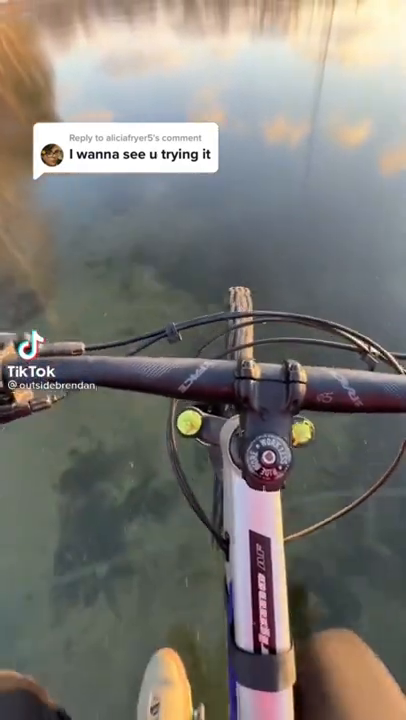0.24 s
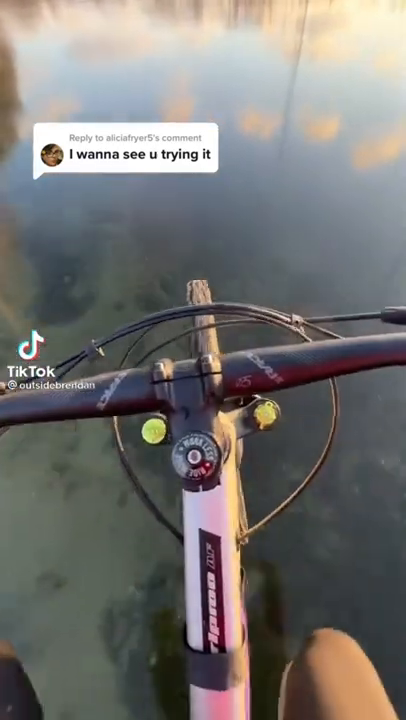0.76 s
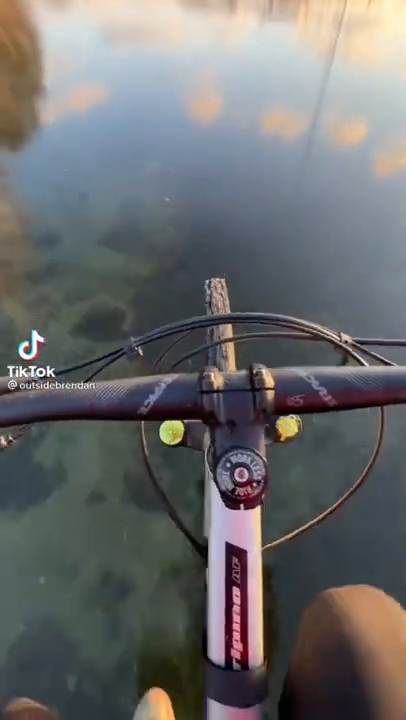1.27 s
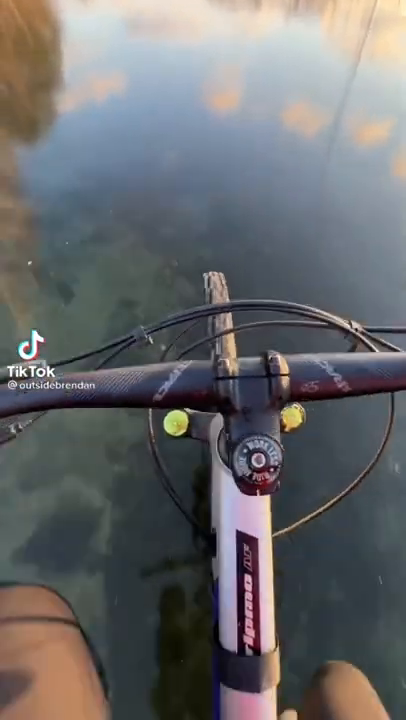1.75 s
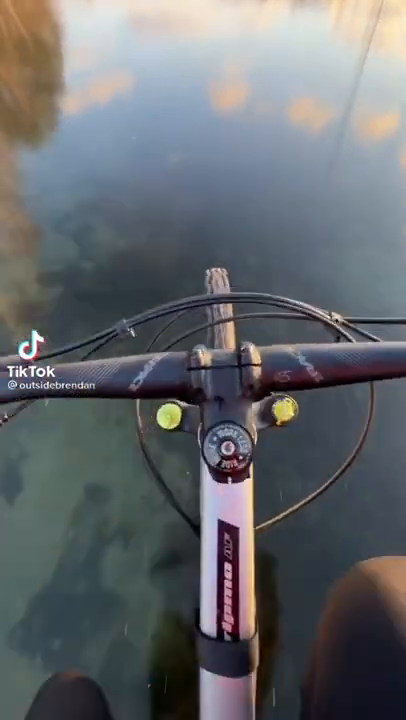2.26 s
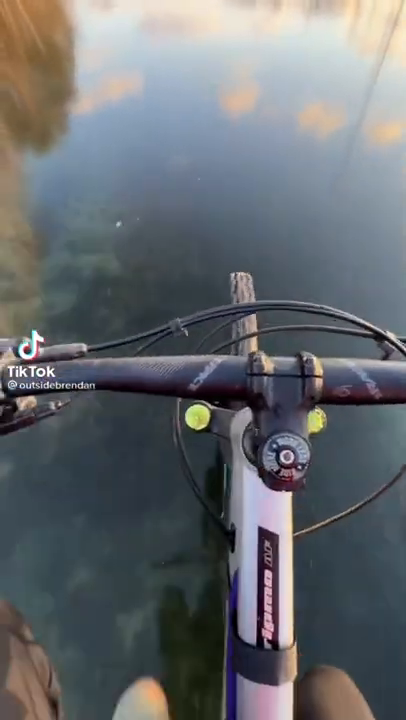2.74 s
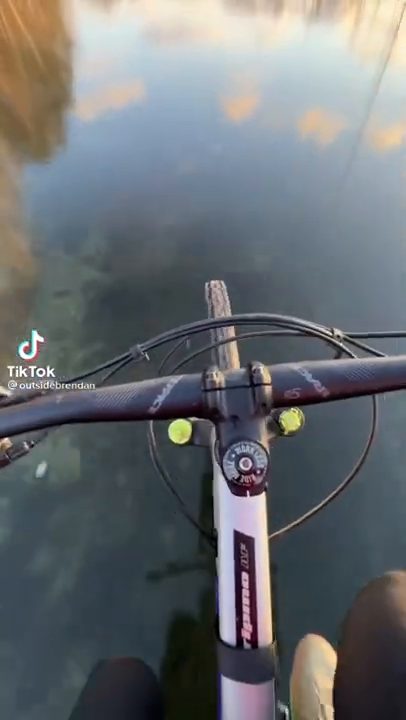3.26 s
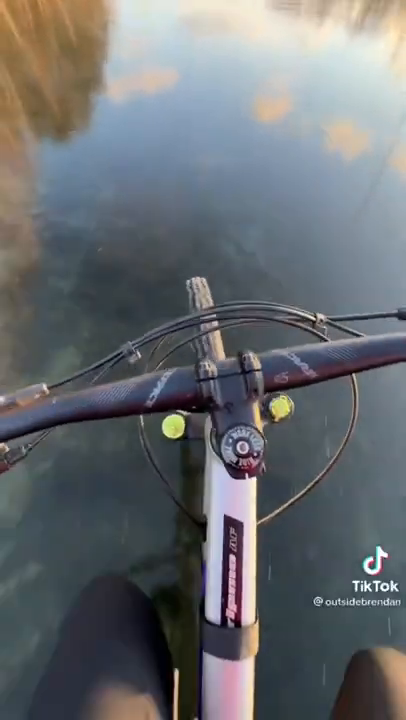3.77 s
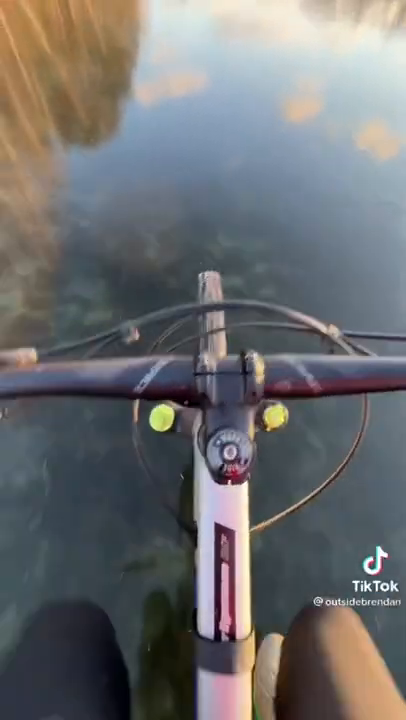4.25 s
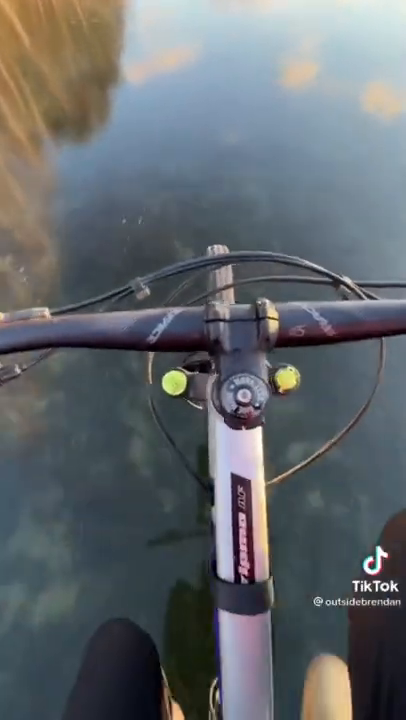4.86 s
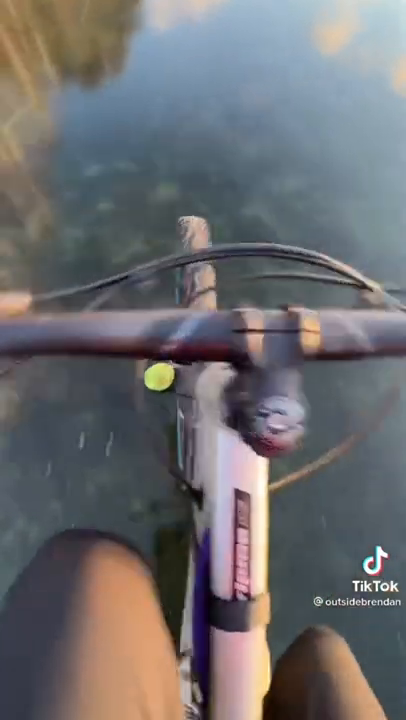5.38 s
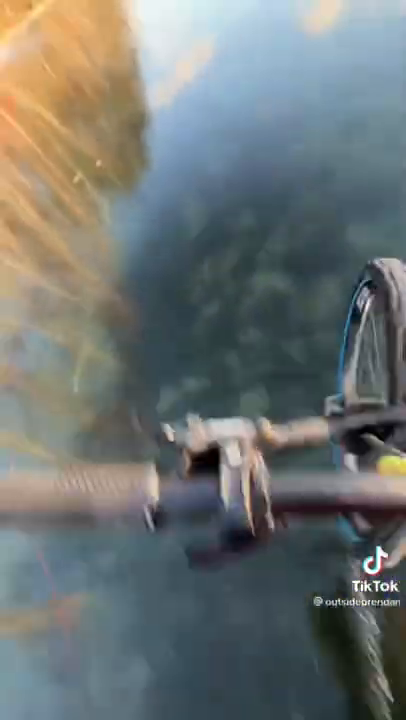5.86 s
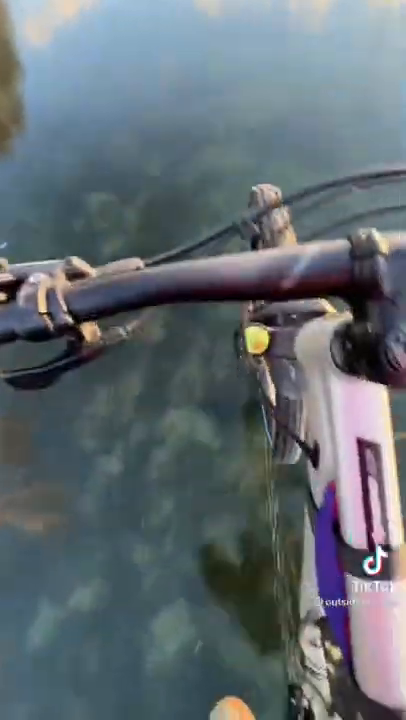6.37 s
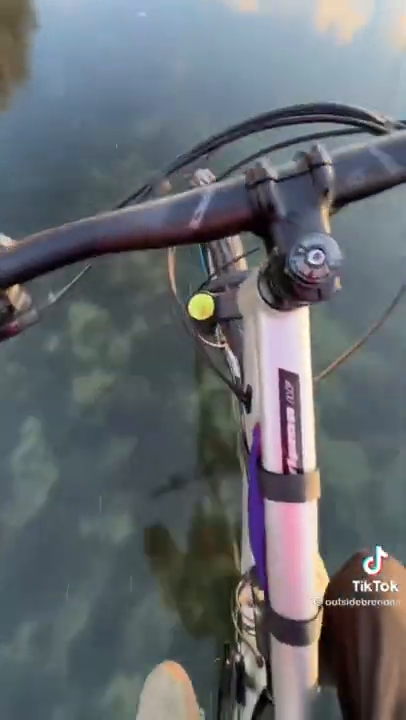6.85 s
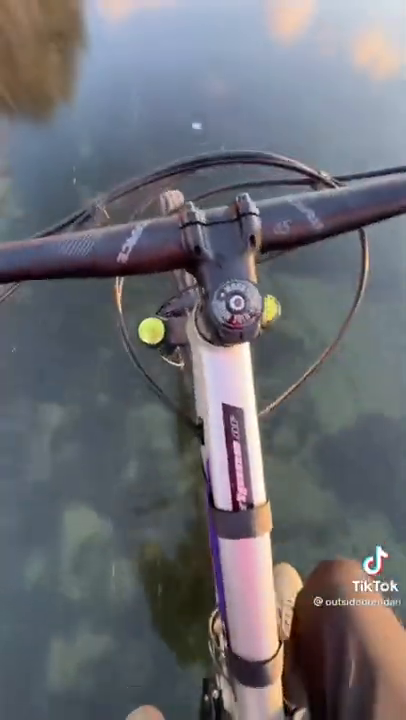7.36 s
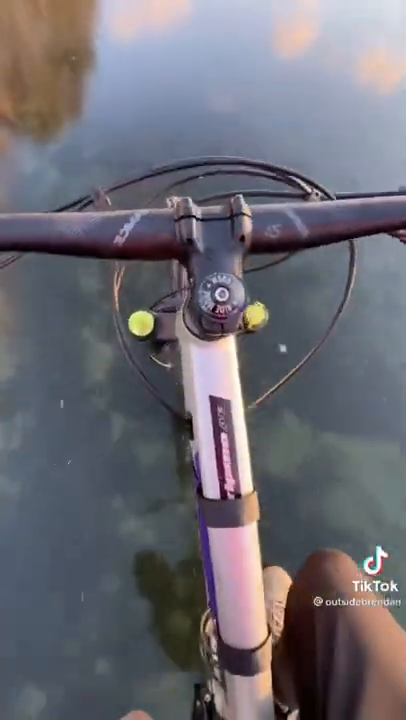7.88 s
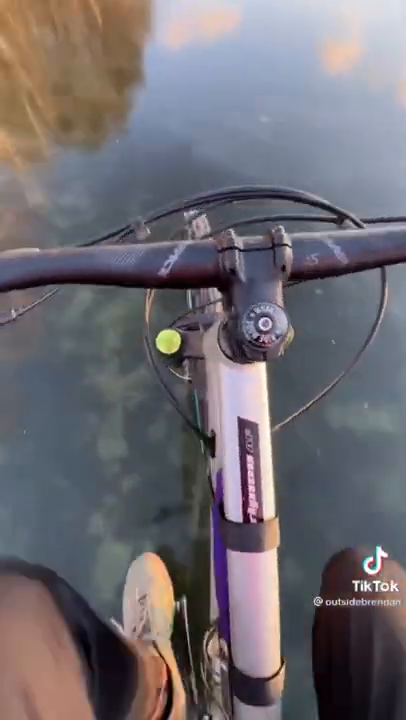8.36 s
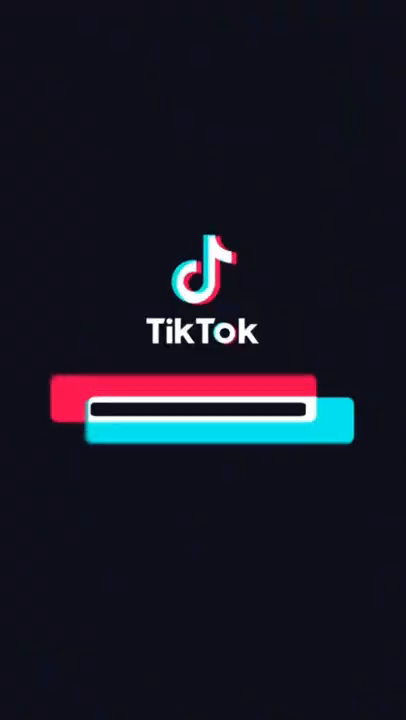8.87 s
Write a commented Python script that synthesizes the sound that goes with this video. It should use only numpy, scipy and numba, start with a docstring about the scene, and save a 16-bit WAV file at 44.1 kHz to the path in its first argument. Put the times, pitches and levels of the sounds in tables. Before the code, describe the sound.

Dense sharp ice clicks from a rolling studded bike, faint chain scrapes early, freehub ticking and rougher crunching later, suddenly cut to silence.

```python
"""A bike on studded tyres rolls over lake ice, heard at two microphone ports on the rider's chest.
From the start studs click on the ice over tyre hum, dust hiss and low wind: sine packets over filtered noise.
The chain scrapes mostly in the first two seconds: short bursts of ringing noise.
From 5.3 s the freehub ticks while coasting, the studs crack harder and the wind and thumps grow rougher.
Near 8.5 s the sound is cut off by a fast fade."""
import sys
import numpy as np
from scipy import signal
from scipy.fft import rfft, irfft, next_fast_len
from scipy.io import wavfile
from scipy.ndimage import uniform_filter1d
from numba import njit

SR = 44100
rng = np.random.default_rng(int(sys.argv[2]) if len(sys.argv) > 2 else 0)


def file_out(sig):
    """Save sig as 16-bit WAV at sys.argv[1]."""
    # one column per channel
    cols = np.atleast_2d(sig).T
    # limit, then scale
    lim = np.clip(cols, -1, 1)
    pcm = np.round(lim * 32767).astype(np.int16)
    wavfile.write(sys.argv[1], SR, pcm)


N = 402277
T = np.arange(N) / SR


def undb(db):
    """Amplitude ratio of a level in dB."""
    return 10 ** (np.asarray(db) / 20)


def unit(x):
    """Scale to an RMS of 1."""
    return x / np.sqrt(np.mean(x ** 2))


def curve(table):
    """Interpolate each column after the first over time."""
    s, *columns = np.transpose(table)
    return [np.interp(T, s, c) for c in columns]


def colour(x, table):
    """Filter by (Hz, dB) or (Hz, dB, phase in rad) points on a log frequency axis."""
    hz, db, *phase = np.transpose(table)
    size = next_fast_len(N)
    log_hz = np.log(np.arange(size // 2 + 1) * SR / size + 1)
    gain = undb(np.interp(log_hz, np.log(hz), db))
    if phase:
        gain = gain * np.exp(1j * np.interp(log_hz, np.log(hz), phase[0]))
    return irfft(rfft(x, size) * gain, size)[..., :N]


def ring(x, modes):
    """Sum of damped resonances, each (Hz, width Hz, dB)."""
    return sum(undb(db) * signal.lfilter(*signal.iirpeak(hz, hz / width_hz, SR), x)
               for hz, width_hz, db in modes)


def walk(rate_hz):
    """Random levels held 1 / rate_hz s, smoothed twice, RMS 1."""
    hold = int(SR / rate_hz)
    steps = np.repeat(rng.standard_normal(N // hold + 1), hold)
    return unit(uniform_filter1d(uniform_filter1d(steps, hold), hold)[:N])


@njit
def grains(s, hz, cycles, size, phase, sag, n, sr):
    """Wave packets, loudest at s after a rise of some cycles; pitch falls by the share sag per rise time."""
    y = np.zeros(n)
    for k in range(len(s)):
        rise = cycles[k] * sr / hz[k]  # samples
        start = max(int(s[k] * sr - rise), 0)
        for i in range(min(int(3 * rise), n - start)):
            u = i / rise
            turns = cycles[k] * (u - 1) * (1 - sag * (u - 1) / 2)
            swell = (u * np.exp(1 - u)) ** 6
            y[start + i] += size[k] * swell * np.sin(2 * np.pi * turns + phase[k])
    return y


def bursts(s, db, length_s):
    """Envelope of bursts that start at s, peak at half their length and fade."""
    env = np.zeros(N)
    for start_s, peak, long_s in np.broadcast(s, undb(db), np.clip(length_s, .001, .6)):
        i = int(start_s * SR)
        u = 4 * T[:int(3 * long_s * SR)] / long_s
        env[i:i + len(u)] += peak * (u / 2) ** 2 * np.exp(2 - u)
    return env


# Wind at the ports. Each row: time in seconds, common part in dB, differing part in dB.
WIND_LEVEL = [(0, -44.5, -60), (.8, -40.5, -68.5), (1.7, -43, -56.5), (2.2, -41, -64), (2.5, -45, -43.5),
              (2.8, -44.5, -60.5), (3.4, -42.5, -59.5), (3.9, -47.5, -32.5), (4.35, -43.5, -42.5),
              (4.85, -47.5, -31.5), (5.3, -42, -36), (5.7, -37, -50.5), (6, -37, -39), (6.2, -41.5, -42.5),
              (6.4, -35, -42), (6.53, -36, -43), (6.66, -39.5, -32.5), (6.8, -33, -30.5),
              (6.87, -49, -31.5), (7.1, -47, -49), (7.4, -50.5, -56), (7.85, -48.5, -46.5),
              (8.4, -52, -47.5)]
# Spectrum of the common wind. Each row: frequency in Hz, relative level in dB per Hz.
GUST_COLOUR = [(13, -47), (22, -46), (43, -8), (70, 3.5), (110, 1), (178, -9.5), (281, -14.5), (300, -26.5),
               (390, -52), (660, -120)]
# Spectrum of the differing wind. Each row: frequency in Hz, relative level in dB per Hz.
CROSSWIND_COLOUR = [(13, -50.5), (22, -33.5), (43, -12.5), (87, -4), (176, -12.5), (411, -25.5),
                    (450, -26.5), (500, -26), (650, -51.5), (1100, -120)]
# headwind flutter, extra flutter in a crosswind, crosswind buffeting relative to the common part
FLUTTER_DB, CROSS_FLUTTER_DB, BUFFET_DB = 0.8, 3, -2.5
BUFFET_MODE = [(50.1, 41, 0)]


def wind():
    """Fluttering low turbulence, common and differing at the ports; rougher and deeper in a crosswind."""
    mid_db, side_db = curve(WIND_LEVEL)
    across = 1 / (1 + undb(-47.5 - side_db))  # 0-1
    flutter_db = FLUTTER_DB * walk(20) + CROSS_FLUTTER_DB * across * walk(10)
    mid = colour(rng.standard_normal(N) * undb(flutter_db), GUST_COLOUR)
    side = colour(rng.standard_normal(N) * undb(3.3 * walk(14)), CROSSWIND_COLOUR)
    rumble = unit(ring(ring(rng.standard_normal(N), BUFFET_MODE), BUFFET_MODE))
    buffet = across * rumble * undb(2.7 * walk(13))
    return undb(mid_db) * (unit(mid) + undb(BUFFET_DB) * buffet), undb(side_db) * unit(side)


# Dull knocks and gust thumps. Each row: peak time in seconds, peak in dB, pitch in Hz, rise in cycles.
KNOCK_EVENTS = [(0.33, -17.5, 500, 0.42), (0.672, -21, 355, 0.86), (2.128, -24, 520, 2.6),
                (2.471, -26, 430, 1.4), (4.61, -30, 95, 0.74), (4.671, -30, 440, 2.2),
                (4.68, -27.5, 80.5, 1.1), (5.175, -28.5, 65, 1.2), (5.303, -29.5, 70, 1.8),
                (5.36, -26, 64.8, 1.3), (5.503, -27.5, 91, 1.1), (5.527, -28, 103, 1.9),
                (5.605, -27, 61, 0.9), (5.901, -34, 78.4, 1.4), (6.102, -21, 128, 2.6),
                (6.316, -22.5, 85, 1.1), (6.481, -22, 97, 2.3), (6.549, -36, 95, 1.3),
                (6.618, -26, 80, 1.5), (6.685, -32, 125, 2), (6.696, -33, 277, 3), (6.724, -29, 140, 4.2),
                (6.775, -31.5, 75.4, 1.2), (6.816, -32, 99, 2.3), (7.872, -32.5, 69, 1.5),
                (8.135, -30, 560, 1.56), (8.141, -28.5, 262, 3.4)]
KNOCK_SAG = 0.37  # share of pitch lost per rise time


def knocks():
    """Heavily damped low wave packets whose pitch sags."""
    s, db, hz, cycles = np.transpose(KNOCK_EVENTS).astype(float)
    return grains(s, hz, cycles, undb(db), np.zeros(len(s)), KNOCK_SAG, N, 1. * SR)


# Spectrum of the tyre hum. Each row: frequency in Hz, relative level in dB per Hz.
HUM_COLOUR = [(71, -30.5), (120, -13), (172, -4.5), (312, -1), (345, -7.5), (374, -2.5), (417, -2.5),
              (485, -7), (622, -12.5), (1300, -16.5), (1690, -20), (2860, -120)]
# Tyre hum. Each row: time in seconds, level in dB.
HUM_LEVEL_DB = [(0, -42), (1.7, -44), (3.4, -43), (4.2, -42.5), (4.75, -44.5), (5.7, -42), (6.2, -45.5),
                (7, -42), (8.4, -45.5)]


def tyre_hum():
    """Tread knobs hum through the frame: low coloured noise with an unsteady level."""
    noise = unit(colour(rng.standard_normal((2, N)), HUM_COLOUR))
    return noise * undb(curve(HUM_LEVEL_DB)[0] + 1.96 * walk(25))


# Stud crackle, also drives the dust. Each row: time in seconds, level in dB before colouring.
CRACKLE_LEVEL = [(0, -43.5), (.2, -40.5), (.5, -46.5), (.9, -44), (1.3, -41.5), (1.6, -43), (1.8, -44.5),
                 (2.15, -44), (2.7, -44.5), (3.05, -42), (3.4, -39), (3.65, -43), (3.85, -33.5), (4, -37),
                 (4.12, -38.5), (4.3, -44.5), (4.85, -42), (5.05, -39), (5.22, -43), (5.55, -34.5),
                 (5.8, -34), (5.95, -38), (6.3, -40), (6.5, -40.5), (6.7, -39.5), (7, -38.5), (7.25, -40),
                 (7.6, -45), (8.05, -42), (8.46, -45.5)]
# Spectrum of the dust hiss. Each row: frequency in Hz, relative level in dB per Hz.
HISS_COLOUR = [(2000, -2), (3500, 0.5), (4500, -5.5), (4850, -6), (5240, -3), (6700, -9), (7400, -15),
               (10600, -17), (12000, -25.5)]
# Sprays of ice dust as the tyres slide. Each row: start in seconds, peak in dB, length in seconds.
SPRAY_EVENTS = [(5.405, -55.5, 0.29), (6.825, -40, 0.14), (6.97, -40, 0.099)]
# hiss level at CALM_DB of crackle, its rise in dB per dB of crackle
HISS_DB, HISS_PER_DB, CALM_DB = -46.5, 0.52, -44


def dust_hiss():
    """Ice dust hisses with a fine grain, louder as the studs crackle harder."""
    steady = undb(HISS_DB + HISS_PER_DB * (curve(CRACKLE_LEVEL)[0] - CALM_DB))
    sprays = bursts(*np.transpose(SPRAY_EVENTS)) * undb(2.2 * walk(130))
    grain = undb(2.0 * walk(60) + 1.24 * walk(350))
    return unit(colour(rng.standard_normal((2, N)), HISS_COLOUR)) * (steady + sprays) * grain


# Chain ticks and scrapes. Each row: start in seconds, peak in dB, length in seconds.
CHAIN_EVENTS = [(0.021, -36.5, 0.0049), (0.263, -38.5, 0.073), (0.301, -39.5, 0.011),
                (0.318, -35.5, 0.0043), (0.324, -32.5, 0.0032), (0.345, -38, 0.0061), (0.395, -44, 0.0028),
                (0.697, -41, 0.01), (0.799, -41.5, 0.0026), (1.04, -42, 0.0031), (1.077, -28.5, 0.0025),
                (1.59, -33.5, 0.0017), (1.713, -30.5, 0.0018), (2.058, -33, 0.02), (2.093, -38, 0.0048),
                (2.103, -30.5, 0.007), (2.112, -28.5, 0.013), (2.117, -31, 0.017), (2.131, -36.5, 0.0033),
                (4.092, -47.5, 0.065)]
# Chain resonances. Each row: frequency in Hz, width in Hz, relative level in dB.
CHAIN_MODES = [(7180, 1100, -1), (9800, 2500, -4), (5620, 1600, 1.5), (2590, 1200, 6.5), (750, 860, 5.5)]


def chain():
    """Chain ticks and scrapes: rough noise bursts through broad metal resonances."""
    rough = bursts(*np.transpose(CHAIN_EVENTS)) * undb(2.4 * walk(400))
    return rough * unit(ring(rng.standard_normal((2, N)), CHAIN_MODES))


# Freehub while coasting. Each row: time in seconds, teeth passed.
HUB_TEETH = [(5.263, 0), (5.399, 6), (5.613, 18), (5.781, 25), (5.978, 34), (6.232, 47), (6.451, 59),
             (6.616, 67), (6.849, 78), (7.07, 88), (7.17, 92), (7.457, 105), (8.012, 129)]
# Freehub ticks. Each row: time in seconds, mean tick level in dB.
TICK_LEVEL = [(5.25, -55.5), (5.7, -40), (6, -47.5), (6.35, -40.5), (6.6, -43.5), (7, -42.5), (7.6, -46.5),
              (7.97, -43.5), (8.06, -53)]
# Hub shell resonances. Each row: frequency in Hz, width in Hz, relative level in dB.
HUB_MODES = [(7430, 1800, 11), (7430, 120, 9), (9340, 1200, 6), (9700, 150, 6.5), (8960, 130, 4),
             (5180, 200, 7.5)]


def freehub():
    """Pawls snap over the teeth and drag between them, ringing the hub shell."""
    s, teeth = np.transpose(HUB_TEETH)
    tick_s = np.interp(np.arange(teeth[-1] + 1), teeth, s)
    level_s, level_db = np.transpose(TICK_LEVEL)
    tick_db = np.interp(tick_s, level_s, level_db) + 2.0 * rng.standard_normal(len(tick_s))
    # the drag weakens by 3.2 dB/s against the ticks
    drag_db = np.interp(T, level_s, level_db, -99, -99) - 10.5 - 3.2 * (T - 7.0) + 2.9 * walk(9)
    envelope = bursts(tick_s - .001, tick_db, 0.005) + undb(drag_db)
    noise = rng.standard_normal((2, N))
    # the balance of the modes wanders from tick to tick
    shell = sum(undb(1.1 * walk(40)) * ring(noise, [mode]) for mode in HUB_MODES)
    return envelope * unit(shell)


# Ice sheet resonances. Each row: frequency in Hz, width in Hz, relative level in dB.
ICE_MODES = [(925, 570, -13), (1447, 470, 16.5), (2090, 1330, 15.5), (3030, 390, 12.5), (3730, 1600, -11)]
RING_S, RING_DB = .0025, -13  # decay and level of the ringing after a click


def ice_sheet(clicks, level_db, centre_hz):
    """The sheet rings on for milliseconds after each click, most near centre_hz, over a steady grind."""
    power = signal.lfilter([1], [1, -np.exp(-1 / (RING_S * SR))], clicks ** 2) / (RING_S * SR)
    drive = undb(RING_DB) * np.sqrt(power) + undb(level_db - 7.0)
    noise = rng.standard_normal(N)
    sheet = 0
    for hz, width_hz, db in ICE_MODES:
        weight = undb(-5.0 * np.log2(hz / centre_hz) ** 2)
        sheet = sheet + weight * ring(ring(noise, [(hz, width_hz, db)]), [(hz, width_hz, 0)])
    return drive * unit(sheet)


# Crackle colour between dull and bright. Each row: time in seconds, centre in Hz.
CENTRE_HZ = [(0, 2490), (.5, 2710), (.9, 2080), (1.3, 2160), (1.58, 2830), (1.8, 2200), (2.1, 2504),
             (2.25, 2146), (2.4, 2890), (2.55, 2214), (3.03, 2130), (3.2, 2760), (3.42, 2130), (3.72, 1950),
             (3.88, 2510), (4.15, 2070), (4.6, 2480), (5.3, 2196), (6.6, 2366), (7.5, 2780), (8.25, 2950),
             (8.4, 2766)]
# Small bites, shorter while the bike leans and the side studs dig in.
# Each row: time in seconds, base rise in seconds.
BITE_RISE_S = [(0, 0.00063), (5.2, 0.00048), (5.65, 0.00027), (5.9, 0.00032), (6.4, 0.0004), (6.9, 0.0004),
               (8.4, 0.00057)]
ROWS_PER_S, ROW_JITTER_S, ROW_DB = 92, .007, 3  # stud rows: pace, full jitter width, extra level
CLUMP_DB = 2.4  # depth of the quieter gaps between clusters
# two bite families; PARTING (0-1) is their distance from the centre
DULL_BITE_HZ, BRIGHT_BITE_HZ, PARTING = 2067, 2955, 0.81


def small_bites(centre_hz, rise_s):
    """Stud rows land at a nearly even pace; weaker chips fly between. Gives s, Hz, cycles and size."""
    at, pitch, big, long, kind = rng.random((3300, 5)).T
    row = np.arange(len(at)) / ROWS_PER_S * SR / N
    tread = row < 1
    jitter = ROW_JITTER_S * (at - .5) * SR / N
    at = np.where(tread, np.clip(row + jitter, 0, 1), at)  # share of the run
    where = (at * (N - 1)).astype(int)
    clump_db = CLUMP_DB * np.minimum(walk(28), 0)[where]
    size = undb(2.3 * np.minimum(-np.log(1 - big), 2.6) + ROW_DB * tread + clump_db)
    centre, rise = centre_hz[where], rise_s[where]
    bright = kind < (centre - DULL_BITE_HZ) / (BRIGHT_BITE_HZ - DULL_BITE_HZ)
    family_hz = np.where(bright, BRIGHT_BITE_HZ, DULL_BITE_HZ)
    # pitch drifts from stud to stud and scatters more when bites are short
    scatter = .00009 / rise * (2 * pitch - 1) + 0.04 * walk(30)[where]
    hz = (centre + PARTING * (family_hz - centre)) * np.exp(scatter)
    return at * N / SR, hz, hz * rise * (0.87 + 1.1 * long), size


# Studs that crack the ice loudly.
# Each row: peak time in seconds, peak in dB before colouring, ring in Hz, rise in ms.
LOUD_BITES = [(0.0243, -17.5, 2150, 0.64), (0.048, -23, 2680.0, 0.86), (0.1592, -12.5, 2170, 0.83),
              (0.1768, -24.5, 2590.0, 1.3), (0.214, -18, 2100.0, 0.62), (0.2189, -15.5, 2650, 1.3),
              (0.2555, -16, 2200, 0.57), (0.276, -7, 2830, 1.1), (0.2842, -22, 2690.0, 1.2),
              (0.3058, -24, 2570.0, 0.85), (0.3112, -22.5, 2570.0, 0.83), (0.3347, -23, 2110.0, 0.77),
              (.4515, -24, 3000, .6), (0.4643, -22, 3100, .6), (0.5667, -22, 3100, .6),
              (0.5822, -22, 2200.0, 0.54), (0.7204, -17.5, 2640, 0.44), (0.844, -21.5, 2090.0, 0.82),
              (1.0991, -22.5, 2300, 0.97), (1.192, -17.5, 2020.0, 0.85), (1.2725, -14.5, 2080, 0.68),
              (1.43, -25.5, 2860, .7), (1.476, -23.5, 3050, .8), (1.508, -16, 2350, 0.44),
              (1.5221, -17, 2800, 0.84), (1.5433, -14.5, 2880, 0.78), (1.5813, -18.5, 2900, 1.3),
              (1.5897, -16, 2960.0, 1), (1.5979, -20, 2900.0, 0.84), (1.6138, -21.5, 3070, 1),
              (1.643, -16.5, 3050, 0.91), (1.6623, -21, 2070, 0.82), (1.672, -23.5, 2970, .8),
              (1.9096, -19.5, 2950, 0.6), (1.9644, -19, 1800, 0.69), (2.0403, -10.5, 2760.0, 0.76),
              (2.0858, -20, 2140, 1.09), (2.096, -25, 2100, 1.2), (2.2245, -20, 2000, 0.59),
              (2.3866, -18, 2930, 0.58), (2.4277, -23, 2810.0, 0.72), (2.435, -24.5, 2660.0, 1.04),
              (2.452, -20, 2980, 0.88), (2.4694, -4, 2020, 0.84), (2.907, -18.5, 2150, 0.72),
              (2.9612, -13.5, 2010, 0.75), (2.985, -19, 2080.0, 0.72), (2.997, -18.5, 2140.0, 0.66),
              (3.0481, -15.5, 2130.0, 0.79), (3.0528, -20, 1900, 1.09), (3.2478, -15, 2180, 0.62),
              (3.255, -15.5, 2180, 0.61), (3.3121, -16, 2760, 1.04), (3.4142, -18, 2060.0, 0.67),
              (3.4838, -16, 2100, 1.0), (3.7254, -14, 1950, 0.59), (3.737, -11.5, 1830, 0.62),
              (3.7572, -12.5, 1940, 0.68), (3.8082, -15.5, 2170.0, 0.52), (3.8334, -13.5, 2800, 0.55),
              (3.8387, -17, 2020.0, 1.2), (3.8483, -19, 2150.0, 0.77), (3.855, -16, 2940.0, 0.73),
              (3.8601, -20, 2770.0, 0.91), (3.8667, -16, 2080.0, 0.95), (3.871, -15.5, 2690.0, 0.7),
              (3.8898, -17.5, 2190, 0.61), (3.9081, -18.5, 2370.0, 0.59), (3.924, -13.5, 2470.0, 0.87),
              (4.1162, -25, 2060, 0.88), (4.1356, -18.0, 2010, 0.7), (4.252, -17.5, 3100, 0.96),
              (4.3287, -16, 1830, 0.98), (4.402, -19, 2110.0, 1.1), (4.5154, -18.5, 2270, 0.9),
              (4.6688, -13.5, 1930, 0.93), (4.731, -14, 2320, 0.44), (5.019, -19.5, 2200, 0.8),
              (5.0488, -23, 2350, 0.41), (5.0675, -21.5, 3040, .9), (5.124, -23, 2560, 0.36),
              (5.2272, -18, 2210, 1.0), (5.314, -23, 2630, 0.48), (5.334, -12.5, 2760, 0.43),
              (5.3441, -9, 2050, 0.83), (5.3598, -7.5, 2420, 0.51), (5.367, -17.5, 1970.0, 1.3),
              (5.3762, -17, 1900.0, 1.04), (5.3841, -21.5, 2020, .9), (5.398, -16, 2370.0, 0.52),
              (5.4409, -23, 1980.0, 0.33), (5.4582, -14, 2730.0, 0.41), (5.464, -20.5, 2600.0, 0.5),
              (5.523, -12, 2800, 0.58), (5.5306, -4, 2520, 0.38), (5.537, -17, 1470, 1.8),
              (5.554, -18, 2480, 0.36), (5.5706, -14.5, 2650.0, 0.5), (5.6084, -16, 1550, 0.92),
              (5.61, -15.5, 3020, .6), (5.6335, -21, 2690, .9), (5.6448, -19, 3600, 0.85),
              (5.6455, -19, 1420, 0.98), (5.6741, -10, 2260, 0.35), (5.683, -10, 2180, 0.63),
              (5.7103, -20, 2840, 0.67), (5.7254, -14.5, 2500.0, 0.48), (5.774, -9.5, 2080, 0.41),
              (5.7943, -7.5, 1740, 0.66), (5.799, -13.5, 2350.0, 0.52), (5.8063, -13.5, 2500, 0.79),
              (5.815, -13.5, 2330.0, 0.53), (5.8215, -12.5, 2530.0, 1), (5.8374, -20.5, 2570, 1),
              (5.8573, -13.5, 2500, 1.04), (6.0287, -16, 2700, 0.63), (6.0659, -15, 2600, 0.53),
              (6.0972, -11.5, 2420, 0.34), (6.1166, -17, 1920, 0.92), (6.206, -18, 1890, 1.1),
              (6.2156, -14.5, 2550, 0.41), (6.3319, -11.5, 2400, 0.45), (6.3816, -10, 2420, 0.4),
              (6.4164, -13.5, 2760, 0.4), (6.4696, -16, 2720, 0.48), (6.473, -16, 2650.0, 0.57),
              (6.5198, -16.5, 2470.0, 0.51), (6.6014, -15, 2470, 0.49), (6.6231, -17, 2360.0, 0.54),
              (6.6314, -16, 2520.0, 0.41), (6.6351, -16.5, 2350.0, 0.7), (6.664, -13.5, 2350, 0.5),
              (6.697, -13, 2730.0, 0.54), (6.7055, -15, 2690.0, 0.33), (6.714, -18, 2890.0, 0.5),
              (6.8483, -17, 2500, 1.22), (6.9092, -18.5, 2920.0, 0.52), (6.9292, -22, 2730, 0.73),
              (7.004, -14.5, 2670, 1.2), (7.0673, -18, 2600, 0.72), (7.082, -15, 2420, 0.63),
              (7.1045, -23, 2780.0, 1), (7.1237, -14, 2740, 0.93), (7.2346, -20, 2780, 0.96),
              (7.2544, -11.5, 2580, 0.31), (7.265, -14.5, 2770, 0.86), (7.2822, -13.5, 2700.0, 0.45),
              (7.289, -15, 2720, 0.38), (7.4193, -19, 2300.0, 0.66), (7.4326, -15.5, 2720, 0.41),
              (7.445, -22, 2650.0, 0.48), (7.4574, -18, 2600.0, 0.5), (7.5544, -24, 2600, 0.57),
              (7.9052, -13.5, 2940, 0.37), (7.9181, -16.5, 2820.0, 0.43), (7.9745, -20, 2450.0, 0.54),
              (8.0137, -15, 2760, 0.45), (8.0383, -20.5, 2290, 0.64), (8.1716, -16.5, 2700, 0.38),
              (8.2655, -18.5, 3140, 0.43), (8.2908, -21, 2840, 1.5), (8.4016, -18.5, 2650.0, 0.53)]
# Colour of all clicks. Each row: frequency in Hz, gain in dB.
CLICK_GAIN = [(500, -3.5), (900, 5), (1500, 0), (3300, -1), (4100, 1.5), (4800, 1), (9000, -20)]
BITE_SAG = 0.034  # share of pitch lost per rise time


def studs():
    """Loud bites and a crackle of small ones set the ice ringing, with random phases on two paths."""
    s, db, hz, rise_ms = np.transpose(LOUD_BITES)
    level_db, centre_hz = curve(CRACKLE_LEVEL)[0], curve(CENTRE_HZ)[0]
    small_s, small_hz, small_cycles, small_size = small_bites(centre_hz, curve(BITE_RISE_S)[0])
    paths = []
    for _ in range(2):
        phase = 2 * np.pi * rng.random(len(s) + len(small_s))
        loud = grains(s, hz, hz * rise_ms / 10 ** 3, undb(db), phase, BITE_SAG, N, 1. * SR)
        small = grains(small_s, small_hz, small_cycles, small_size, phase[len(s):], BITE_SAG, N, 1. * SR)
        clicks = colour(loud + undb(level_db) * unit(small), CLICK_GAIN)
        paths.append(clicks + ice_sheet(clicks, level_db, centre_hz))
    return np.array(paths)


# Colouring between the ports. Each row: frequency in Hz, side minus mid in dB, phase of side in rad.
PORT_COLOUR = [(297, -16, -3.5), (750, -0.5, -1.5), (1150, -6.5, -4.5), (1500, -15.5, -2),
               (1900, -31, -1.5), (2316, -6, -1.5), (2800, -2, -2.5), (3500, -3.5, -1.6),
               (4200, -3.5, -1.5), (4870, -0.5, -1), (5260, 0, -1.5), (6760, -11.5, -1.5), (8150, 2, -1.5),
               (9460, -9, -1.5), (11200, 7, -1.5)]


def scene(alike=0.57):
    """Both ports hear the bike through their colouring; the wind acts on them directly."""
    mid, stray = studs() + tyre_hum() + dust_hiss() + knocks() + chain() + freehub()
    # alike: share of the side wave common with mid, the rest arrives by other paths
    alike = np.clip(alike, 0, 1)
    side = colour(alike * mid + np.sqrt(1 - alike ** 2) * stray, PORT_COLOUR)
    air_mid, air_side = wind()
    mid, side = mid + air_mid, side + air_side
    return np.array([mid + side, mid - side])


DIP_HZ, DIP_SHARE = 4860, 0.25  # dip in the microphone's response
DULL_HZ, TOP_HZ = 11500, 15865  # low-pass edges before and after the cut
END_S = 8.497


def record(dry):
    """Microphone dip, steep low-pass filters and a cut-off at END_S."""
    dry = dry - DIP_SHARE * ring(dry, [(DIP_HZ, 450, 0)])
    dull = signal.sosfilt(signal.ellip(10, .2, 60, DULL_HZ, fs=SR, output="sos"), dry)
    after_s = np.maximum(T - END_S, 0)
    # a drop of 16 dB, then a fade of 1300 dB/s
    cut = dull * np.where(after_s > 0, undb(-16 - 1300 * after_s), 1)
    return signal.sosfilt(signal.ellip(8, .2, 70, TOP_HZ, fs=SR, output="sos"), cut)


dry = scene()
out = record(dry)
file_out(out)
```